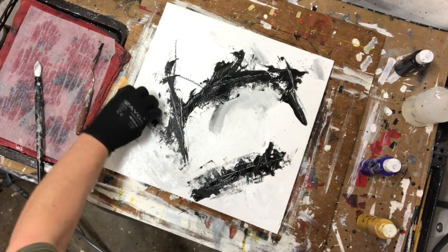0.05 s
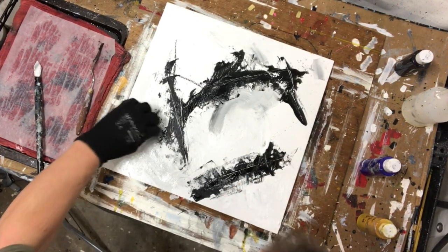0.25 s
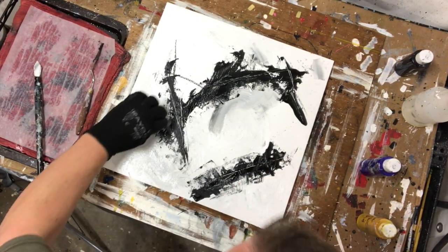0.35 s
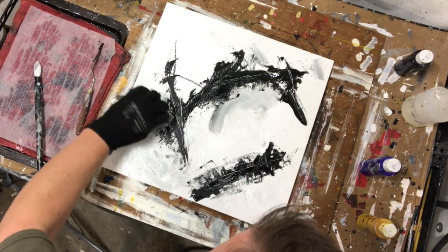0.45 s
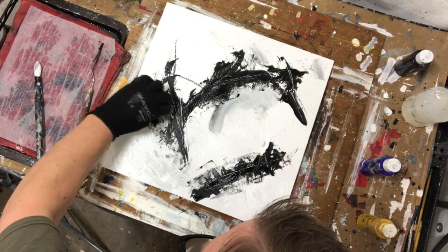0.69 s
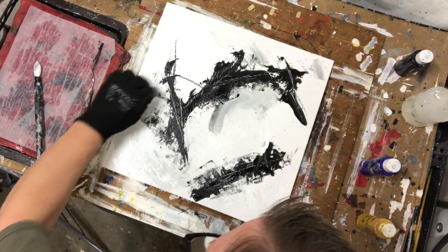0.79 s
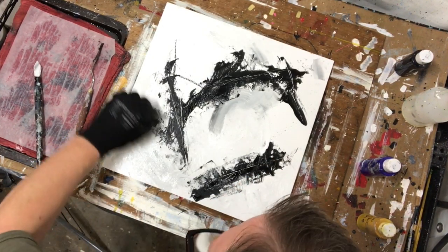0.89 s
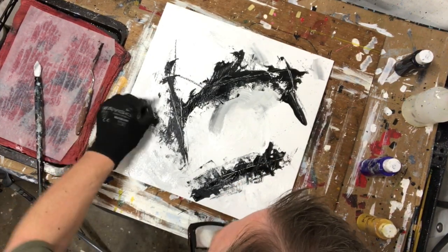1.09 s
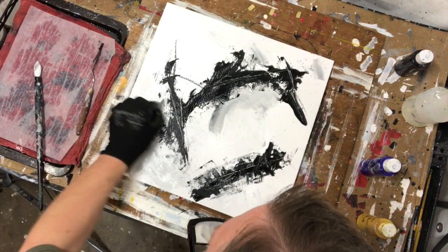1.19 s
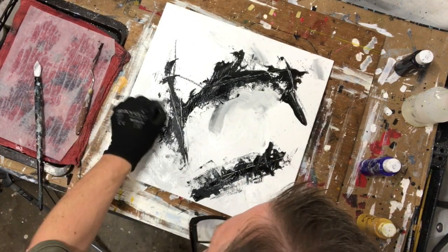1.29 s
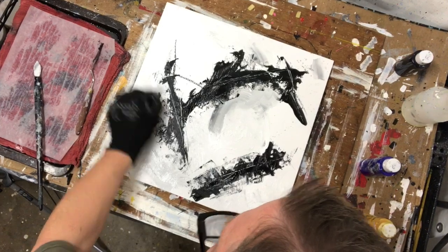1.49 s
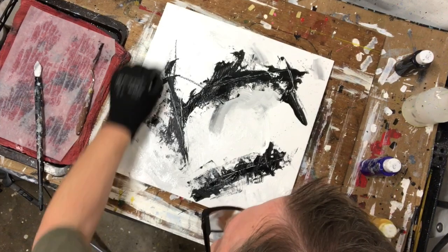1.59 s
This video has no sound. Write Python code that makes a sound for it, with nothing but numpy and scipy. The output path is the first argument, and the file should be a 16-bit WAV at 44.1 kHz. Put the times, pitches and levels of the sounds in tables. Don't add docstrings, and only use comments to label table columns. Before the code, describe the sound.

Short rough scrapes and sharp woody taps of a painting blade on a board, close up

```python
import sys
import numpy as np
from scipy import signal
from scipy.io import wavfile
from scipy.ndimage import uniform_filter1d

SR = 44100
rng = np.random.default_rng(int(sys.argv[2]) if len(sys.argv) > 2 else 0)


def bounce(signal):
    frames = np.transpose(np.atleast_2d(signal))
    limited = np.clip(frames, -1, 1)
    pcm = np.round(limited * 32767).astype(np.int16)
    wavfile.write(sys.argv[1], SR, pcm)


def amplitude_ratio(level_db):
    exponent = np.asarray(level_db, float) / 20
    return 10 ** exponent


N = 72765

# (frequency [Hz], T60 [s], level [dB])
BOARD_MODES = [(669, 0.098, -5), (883, 0.024, -2), (1158, 0.012, 3.5), (1331, 0.058, -6.5),
               (1521, 0.013, 7), (1800, 0.012, 4), (2062, 0.015, 4.5), (2520, 0.05, -1.5),
               (2694, 0.074, -10), (2960, 0.0077, -10), (3327, 0.0079, 14), (4260, 0.03, -3),
               (4643, 0.0095, 9), (5230, 0.0064, -5)]
# (frequency [Hz], level [dB])
RASP_COLOUR = [(100, -53.5), (520, -19.5), (900, -10.5), (1500, -0.5), (3500, -1), (6000, -5),
               (9000, -19.5), (12000, -38.5)]
# (frequency [Hz], level [dB])
FIZZ_COLOUR = [(3000, -30), (6000, -3), (9000, -3), (10500, -7), (12500, -4), (14500, -7), (15500, -9),
               (16500, -30)]


def evened(x):
    return x / np.sqrt(np.mean(x ** 2) + 1e-20)


def drift(steps):
    once = uniform_filter1d(rng.standard_normal(N), steps)
    return evened(uniform_filter1d(once, steps))


def read(points, hz):
    f, value = np.transpose(points)
    return np.interp(np.log(hz + 1), np.log(f + 1), value)


def colour(x, points):
    hz = abs(np.fft.fftfreq(2048, 1 / SR))
    log_gain = np.log(amplitude_ratio(read(points, hz)))
    response = np.fft.ifft(np.exp(np.conj(signal.hilbert(log_gain)))).real[:1024]
    return signal.oaconvolve(x, response / np.linalg.norm(response))[:len(x)]


def resonate(x, hz, width):
    turn = np.exp(2j * np.pi * np.cumsum(hz * np.ones(len(x))) / SR)
    r = np.exp(-np.pi * width / SR)
    return 2 * (turn * signal.lfilter([1 - r], [1, -r], x / turn + 1e-18)).real


def board_ring(tilt_db=0):
    spread_db, longest_t60 = 1.5, 0.04
    t = np.arange(4000)[:, None] / SR
    hz, t60, db = np.transpose(BOARD_MODES)
    share, sign = rng.standard_normal((2, len(hz)))
    level_db = db + tilt_db * np.log2(hz / 1500) + spread_db * share
    decay_db = -60 * t / np.minimum(t60, longest_t60)
    modes = amplitude_ratio(level_db + decay_db) * np.sign(sign + 0.4) * np.sin(2 * np.pi * hz * t)
    out = modes.sum(1)
    return out / np.linalg.norm(out)


def taps():
    # (time [s], strength [dB], contact sharpness [Hz],
    # second touch [dB re first], board tilt [dB per octave])
    landings = [(0.0617, -35, 2530, -5, -4), (.2439, -11.5, 3700, 7.5, 0), (0.374, -23.5, 2270, 0.5, 0),
                (0.4224, -37, 3070, -2, -8), (0.4894, -8, 4500, 5.5, -1), (0.5043, -18.5, 1620, 17, -2.5),
                (0.522, -45, 3880, -14, -1), (.7035, -24.5, 2660, -11, 3.5), (.709, -31, 1580, -36, -1.5),
                (0.9349, -17, 2050, 0.5, -0.5), (0.975, -33, 2030, -1, -19), (1.206, -23, 1800, 2, -9),
                (1.357, -21, 1460, 28, 10), (.318, -30, 1910, -15, -1.5), (0.2592, -37, 3030, 0, -2)]
    second_touch_s, crack_s, crack_db, snap_db, tick_db = 0.002172, 0.0052, -5, -3.5, -36.5
    out = np.zeros(N + 6000)
    t = np.arange(2000) / SR
    for s, db, sharp_hz, second_db, tilt_db in landings:
        crack = rng.standard_normal(len(t)) * np.minimum(t / 0.00074, 1) * np.exp(-(t / crack_s) ** 2)
        crack = crack / np.linalg.norm(crack)
        force = amplitude_ratio(crack_db) * crack
        force[0] += 1
        force[round(second_touch_s * SR)] += amplitude_ratio(second_db)
        force = signal.sosfilt(signal.butter(4, sharp_hz, fs=SR, output="sos"), force)
        sound = np.convolve(force, board_ring(tilt_db))
        sound[:len(t)] += amplitude_ratio(snap_db) * colour(force, RASP_COLOUR)
        sound = sound / abs(sound).max()
        tick = colour(crack, FIZZ_COLOUR) / abs(crack).max()
        sound[:len(t)] += amplitude_ratio(tick_db) * (sharp_hz / 4000) ** 2 * tick
        out[round(s * SR):][:len(sound)] += amplitude_ratio(db) * sound
    return out[:N]


def pressure():
    # (time of full pressure [s], rise [s], hold [s], pressure [dB])
    pushes = [(0, .01, 0.0041, -48), (0.011, 0.00093, 0.0019, -44), (0.05, 0.0023, 0.015, -50),
              (0.282, 0.004, 0.01, -44), (0.3, 0.0091, 0.022, -38), (0.304, 0.011, .008, -39.5),
              (0.323, 0.0044, 0.0022, -50), (0.419, 0.0062, 0.0011, -53.5), (0.558, 0.045, 0.015, -45.5),
              (0.589, 0.0033, 0.0023, -42.5), (0.598, .008, 0.0061, -50.5), (0.699, 0.019, 0.0073, -36),
              (0.861, 0.0069, 0.00091, -79), (0.866, 0.0036, 0.0018, -62), (0.888, .002, 0.0015, -63),
              (0.914, 0.0024, .002, -62.5), (0.9417, 0.0036, 0.001, -43.5), (1.612, 0.0013, .003, -84),
              (0.988, 0.011, 0.011, -26.5), (1.006, 0.0047, 0.018, -27.5), (1.179, 0.026, 0.014, -27),
              (1.2, 0.0091, 0.0093, -26.5), (1.219, .006, 0.0055, -33.5), (1.231, 0.0064, 0.012, -42),
              (1.273, 0.019, 0.0027, -35), (1.281, .006, 0.012, -31.5), (1.348, 0.014, 0.019, -28),
              (1.377, 0.012, 0.0048, -37)]
    rise_db, release_db_per_s = 23, 1447
    t = np.arange(N)[:, None] / SR
    full, rise, hold, db = np.transpose(pushes)
    swell = np.minimum((t - full) / rise, 0)
    rising_db = rise_db * swell * (1 - 2 * np.minimum(swell + 1, 0))
    falling_db = release_db_per_s * np.maximum(t - full - hold, 0)
    level_db = np.maximum(db + rising_db - falling_db, -140)
    return np.sqrt((amplitude_ratio(level_db) ** 2).sum(1))


def scrape():
    # (start [s], blade ring [Hz], ring level [dB], fizz level [dB], board level [dB])
    runs = [(0, 3720, 8, 2, 2), (.04, 4000, 1, -9, -8), (.2, 2900, 5, -23, -6), (0.293, 3160, 4.5, -2, 1),
            (.4, 3100, -4, -15, 6), (.52, 3810, 6, -10, -3), (0.582, 4090, 8.5, 0, 6.5),
            (.65, 3970, -4, -13.5, -4), (.8, 3800, 1, 12, 6), (.93, 5450, -52, -3, -3),
            (.96, 3940, -0.5, -15.5, -2.5), (1.14, 2780, -2, -26, -7.5), (1.195, 3880, -0.5, -15.5, -1.5),
            (1.26, 4050, -8.5, -18.5, -1), (1.33, 3924, 3.5, -14, 1), (1.55, 6070, -13, 6, -23)]
    # (ratio to its ring [-], width [Hz], level [dB])
    partials = [(0.643, 238, -7.5), (1., 386, 2.5), (1.14, 348, -40), (1.5, 456, -5), (1.72, 490, -8),
                (2.05, 480, -36)]
    grit_per_s, grit_spread_db, lump_db, lump_s = 9800, 1.8, 1, 0.0048
    flex_depth, fizz_growth, rasp_db = 0.019, 0.3, -1

    grain_size = amplitude_ratio(grit_spread_db * np.minimum(rng.exponential(1, N), 4))
    grit = (rng.random(N) < grit_per_s / SR) * grain_size
    grit = evened(grit * amplitude_ratio(lump_db * drift(round(lump_s * SR))))
    push = pressure()
    signs = rng.choice([-1., 1.], (4, N))
    drive, edge, rasp, fizz = signs * push * grit
    fizz = fizz * (push / amplitude_ratio(-28.5)) ** fizz_growth

    run = np.searchsorted(np.transpose(runs)[0], np.arange(N) / SR, "right") - 1
    _, hz, ring_db, fizz_db, board_db = np.array(runs)[run].T
    board = np.zeros(N)
    for k in range(len(runs)):
        board += signal.oaconvolve(drive * (run == k) * amplitude_ratio(board_db), board_ring())[:N]

    bent_hz = hz * (1 + flex_depth * drift(300))
    blade = np.zeros(N)
    for ratio, width, db in partials:
        once = resonate(edge * amplitude_ratio(ring_db), bent_hz * ratio, width)
        twice = resonate(once, bent_hz * ratio, 2 * width)
        blade += amplitude_ratio(db) * np.sqrt(SR / width) * twice

    rasp = amplitude_ratio(rasp_db) * colour(rasp * amplitude_ratio(board_db / 2), RASP_COLOUR)
    fizz = colour(fizz * amplitude_ratio(fizz_db), FIZZ_COLOUR)
    return board + 0.25 * blade + rasp + fizz


def squeaks():
    # (peak time [s], frequency [Hz], half length [s], level [dB])
    catches = [(0.012, 3910, 0.0014, -34), (.008, 1895, .004, -43.5), (0.0504, 3920, 0.0013, -36.5),
               (0.063, 1395, 0.0015, -46.5), (.300, 3000, 0.0032, -32), (.308, 3310, 0.0023, -32.5),
               (.317, 3180, 0.0028, -31), (.320, 1453, 0.0046, -30.5), (.332, 1430, .004, -39),
               (.333, 3370, 0.0022, -39), (.424, 1376, 0.0023, -40.5), (.4255, 3300, 0.0013, -48),
               (0.701, 4000, 0.0032, -36.5), (0.7064, 1800, 0.0011, -26), (.7098, 1480, 0.0012, -32.5),
               (.709, 2710, 0.0027, -35), (.713, 888, 0.0038, -40.5), (0.939, 878, 0.0037, -32.5),
               (.941, 654, 0.0057, -38), (0.985, 3980, 0.0033, -31.5), (0.994, 4065, 0.0033, -22),
               (1.003, 3960, 0.0016, -23), (1.007, 4100, 0.00095, -22), (1.0145, 3890, 0.0019, -28.5),
               (1.021, 3904, 0.0025, -26), (1.017, 2520, 0.0054, -24), (0.992, 1490, 0.0021, -24.5),
               (1.010, 1487, .003, -25.5), (1.02, 1780, 0.0066, -31.5), (1.185, 2890, 0.0038, -30),
               (1.187, 3650, .002, -28.5), (1.200, 4190, 0.0022, -26), (1.197, 6660, 0.0026, -28),
               (1.195, 2540, 0.0065, -30.5), (1.208, 3750, 0.0023, -25.5), (1.209, 1700, 0.0028, -27.5),
               (1.208, 678, 0.0061, -35), (1.223, 1940, 0.0059, -31.5), (1.277, 2610, .004, -33),
               (1.279, 4690, 0.0045, -37), (1.293, 4660, 0.0031, -41), (1.303, 1950, 0.0034, -37),
               (1.358, 3816, 0.0045, -23), (1.374, 662, 0.0075, -37), (1.358, 996, 0.0057, -31.5)]
    waver_depth, linger = 0.014, 0.98
    s, hz, half, db = np.transpose(catches)
    t = np.arange(N)[:, None] / SR - s
    phase, bend = rng.random((2, len(s)))
    waver = waver_depth * hz * half * np.sin(t / half + 2 * np.pi * bend)
    swell = np.exp(-0.5 * (t / np.where(t > 0, linger * half, half)) ** 2)
    return (amplitude_ratio(db) * swell * np.sin(2 * np.pi * (hz * t + waver + phase))).sum(1)


def thumps():
    # (time [s], frequency [Hz], level [dB])
    knocks = [
        (1.194, 138, -45.5),
        (1.205, 262, -47.5),
        (.99, 290, -47.5),
        (1.5, 260, -50),
        (1.36, 255, -46.5),
        (0.54, 190, -52),
        (0.025, 347.6, -47),
        (0.246, 343, -47),
        (1.37, 121.6, -52.5),
    ]
    s, hz, db = np.transpose(knocks)
    t60 = 0.2
    t = np.maximum(np.arange(N)[:, None] / SR - s, 0)
    onset = np.minimum(t / 0.0045, 1)
    return (amplitude_ratio(db - 60 * t / t60) * onset * np.sin(2 * np.pi * hz * t)).sum(1)


def room(x):
    # (frequency [Hz], T60 [s])
    decay = [(200, 0.096), (700, 0.42), (2500, 0.32), (5000, 0.28), (9000, 0.36), (15000, 0.085)]
    tail_db, early_db, early_t60 = -14, -14, 0.091
    length = SR // 2
    pulses = np.zeros((2, length))
    slots = np.arange(200, length - 20, 20)
    at = slots + rng.integers(0, 20, (2, len(slots)))
    np.put_along_axis(pulses, at, rng.choice([-1., 1.], at.shape), 1)
    hz, t, z = signal.stft(pulses[0], SR, nperseg=256)
    fading = z * amplitude_ratio(-60 * t / read(decay, hz)[:, None])
    tail = signal.istft(fading, SR, nperseg=256)[1][:length]
    early = pulses[1] * amplitude_ratio(-60 * np.arange(length) / SR / early_t60)
    both = amplitude_ratio(tail_db) * tail / np.linalg.norm(tail) + amplitude_ratio(early_db) * early / np.linalg.norm(early)
    return signal.fftconvolve(x, both)[:N]


def echo():
    level_db, t60 = -49, 0.65
    fade = amplitude_ratio(level_db - 60 * np.arange(N) / SR / t60)
    return fade * colour(rng.standard_normal(N), RASP_COLOUR)


def air():
    # (frequency [Hz], level [dB])
    floor_colour = [(31, -56), (60, -7.5), (125, -12.5), (300, -5.5), (600, -17), (2000, -16.5),
                    (6000, -27.5), (15800, -40.5)]
    floor_db, patch_db = -57, 0.99
    hz = np.fft.rfftfreq(1024, 1 / SR)
    a, b, patches = rng.standard_normal((3, len(hz), N // 256 + 5))
    patches = evened(uniform_filter1d(uniform_filter1d(patches, 10, 0), 10, 1))
    z = (a + 1j * b) * amplitude_ratio(read(floor_colour, hz)[:, None] + patch_db * patches)
    return amplitude_ratio(floor_db) * evened(signal.istft(z, nperseg=1024, noverlap=768)[1][:N])


def scene():
    lean = signal.butter(2, 617, "high", fs=SR, output="sos")
    blade = signal.sosfilt(lean, taps() + scrape()) + squeaks()
    return (blade + room(blade) + thumps() + echo() + air())[None]


def low_pass(x):
    return signal.sosfilt(signal.butter(12, 15910, fs=SR, output="sos"), x)


def record(dry):
    band_limit = signal.firwin(511, 15780, window=("kaiser", 9), fs=SR)
    limited = signal.oaconvolve(dry, band_limit[None], "same")
    return low_pass(limited)


dry = scene()
out = record(dry)
bounce(out)
```